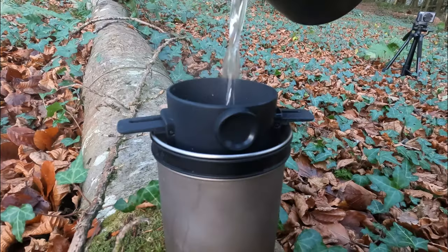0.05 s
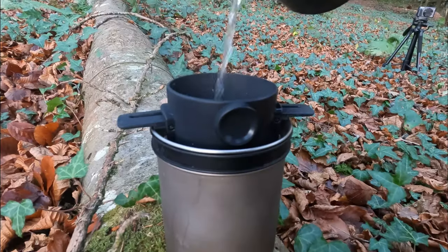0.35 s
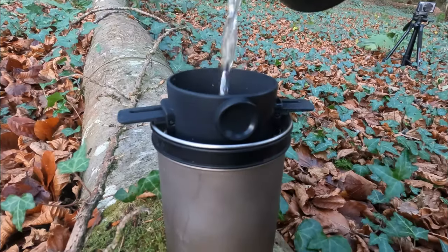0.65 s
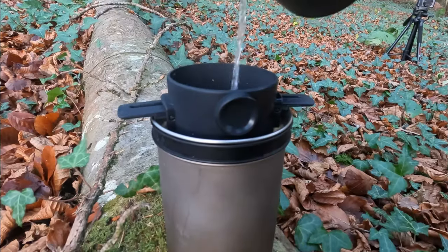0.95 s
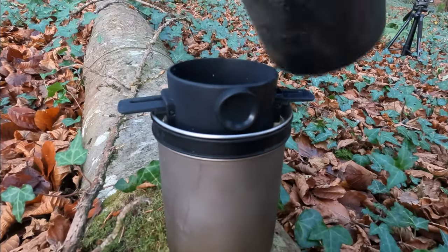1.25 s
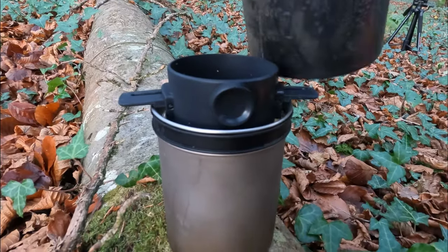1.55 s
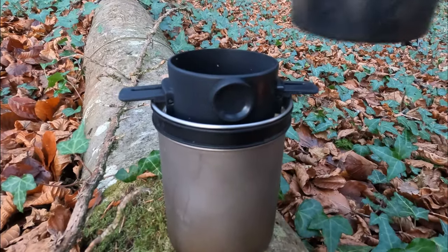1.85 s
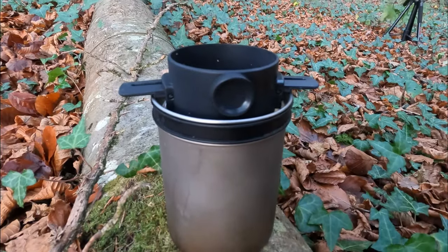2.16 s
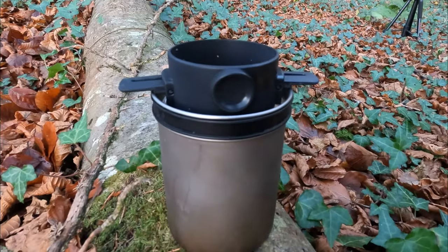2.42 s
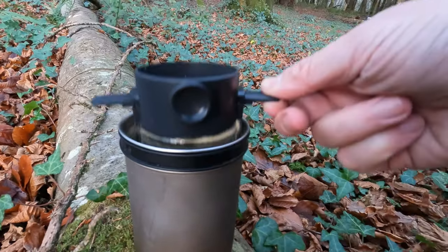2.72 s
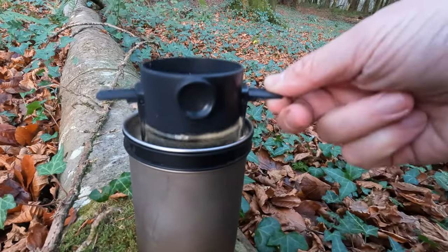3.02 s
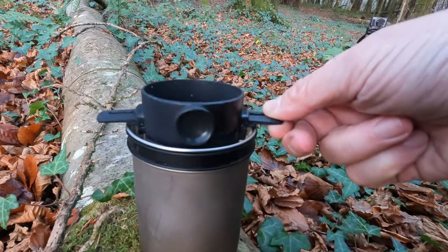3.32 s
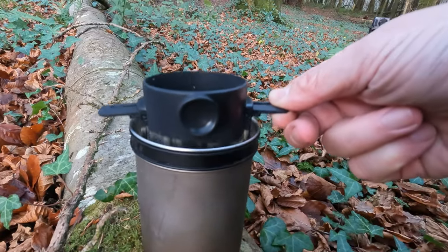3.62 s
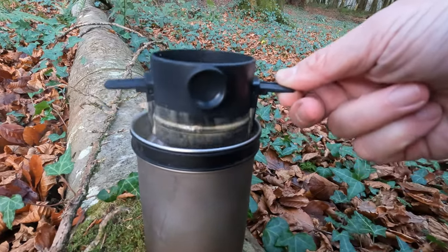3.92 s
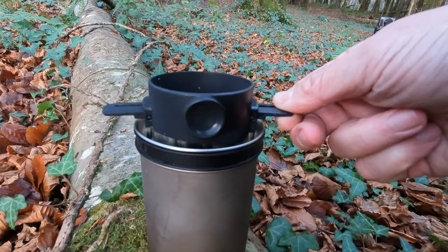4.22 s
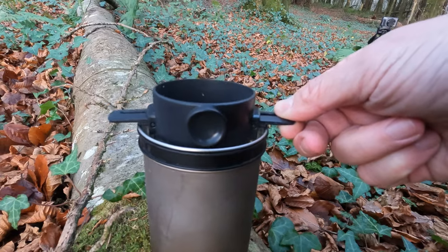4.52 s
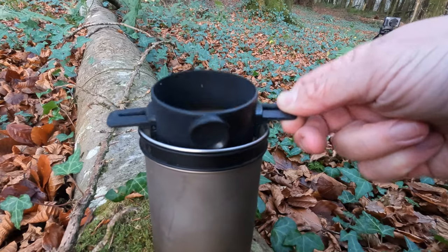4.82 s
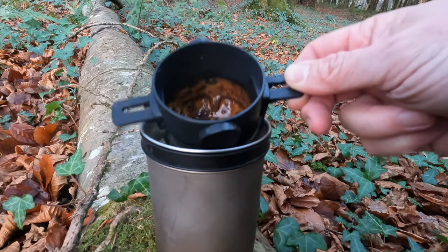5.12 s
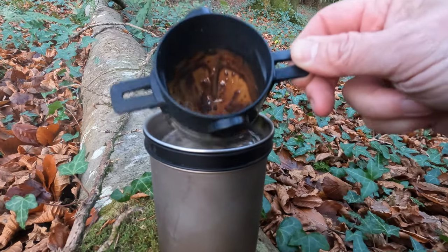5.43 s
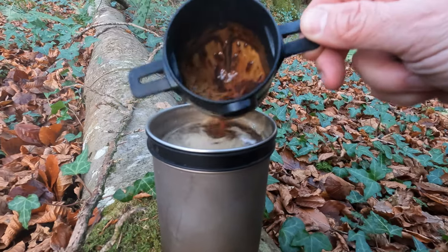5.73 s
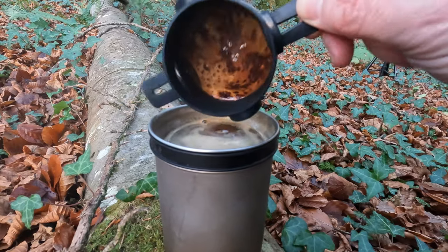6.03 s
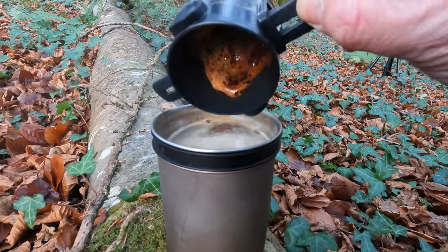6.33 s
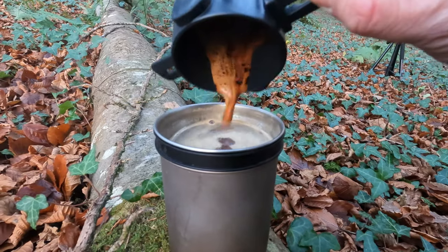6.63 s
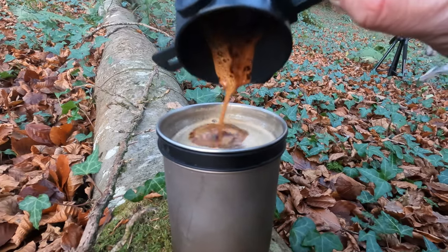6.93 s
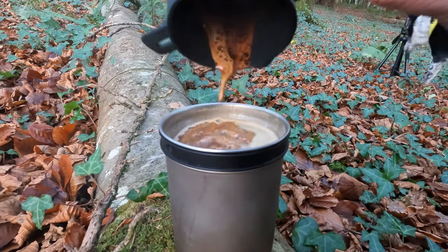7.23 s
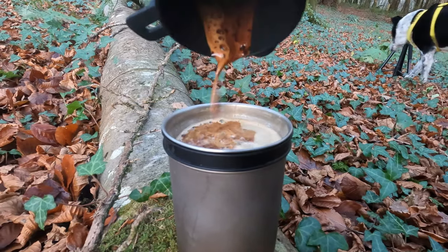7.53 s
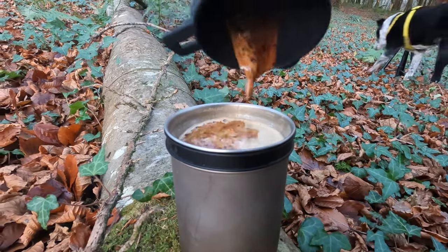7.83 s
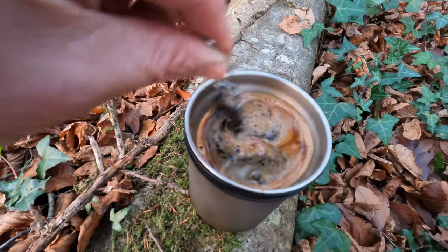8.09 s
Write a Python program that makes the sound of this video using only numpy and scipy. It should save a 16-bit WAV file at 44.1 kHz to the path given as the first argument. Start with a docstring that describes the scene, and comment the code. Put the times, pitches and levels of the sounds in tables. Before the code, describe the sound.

Low gusts of wind buffet the microphone over a faint woodland hush. Close by, water drips and splashes into a plastic coffee filter, stopping just before a pot clacks against it. A run of hollow knocks and clinks follows, with soft gulps of liquid, as the filter dips in a metal cup. Faint paw steps in dry leaves draw nearer, and a spoon briefly clinks and scrapes in the cup.

```python
"""Brewing coffee in the woods

A thin stream of hot water breaks into drops that ring a plastic filter, and the pot bumps its handle.
The filter is dunked in a metal cup, knocking on the rim while coffee gulps through its mesh, then
tipped out; at the end a spoon taps and scrapes the cup. Behind this the woods hush, a dog crushes
dry leaves, and turbulent wind buffets the microphone."""
import sys
import numpy as np
from scipy import signal
from scipy.fft import rfft, irfft
from scipy.io import wavfile
from scipy.ndimage import uniform_filter1d

SR = 44100
rng = np.random.default_rng(int(sys.argv[2]) if len(sys.argv) > 2 else 0)


def to_wav(sig):
    """Store sig (one row per channel, or 1-D mono) as 16-bit WAV at the path in sys.argv[1].

    Samples outside -1..1 are clipped; the rate is SR.
    """
    pcm = np.clip(np.atleast_2d(sig), -1, 1) * 32767
    pcm = np.round(pcm).astype(np.int16)
    wavfile.write(sys.argv[1], SR, pcm.T)  # frames by channels


N = 364266
TIME = np.arange(N) / SR
RING = np.arange(SR // 3) / SR  # time axis of one impact


def amp(db):
    return 10 ** (np.asarray(db) / 20)


def unit_rms(x):
    return x / np.sqrt(np.mean(x ** 2) + 1e-20)


def unit_peak(x):
    return x / (abs(x).max() + 1e-20)


def curve(points, t=TIME):
    """Linear interpolation in time."""
    return np.interp(t, *np.transpose(points))


def at_hz(points, hz):
    """Interpolation on a logarithmic frequency axis."""
    f, value = np.transpose(points)
    return np.interp(np.log(hz + 1), np.log(f + 1), value)


def add(mix, start, sound):
    """Superposition: a sound joins the mix at its start time."""
    part = mix[max(round(start * SR), 0):][:len(sound)]
    part += sound[:len(part)]


def colour(x, spectrum):
    """Spectral shaping, at unit RMS."""
    gain = amp(at_hz(spectrum, np.fft.rfftfreq(len(x), 1 / SR)))
    return unit_rms(irfft(rfft(x) * gain, len(x)))


def band(x, lo_hz, hi_hz):
    return signal.sosfilt(signal.butter(2, [lo_hz, hi_hz], "band", fs=SR, output="sos"), x)


def burst(t60):
    """Exponential decay of white noise."""
    return rng.standard_normal(len(RING)) * amp(-60 * RING / t60)


def ring(modes):
    """Free vibration: one damped sinusoid for each mode (f/Hz, level/dB, t60/s)."""
    return sum(amp(db - 60 * RING / t60) * np.sin(2 * np.pi * hz * RING) for hz, db, t60 in modes)


def resonate(x, hz, width_hz):
    """Forced vibration of a double-pole resonator, held at a nearly even level."""
    pole = np.exp((2j * np.pi * hz - np.pi * width_hz) / SR)
    y = unit_rms(signal.lfilter([1], [1, -2 * pole, pole * pole], x).real)
    return y / np.sqrt(abs(uniform_filter1d(y ** 2, size=1500)) + 0.1)


def clicks(per_s, spread_db, size=N):
    """Shot noise: random impulses, mostly small and a few large."""
    height = amp(spread_db * np.minimum(rng.exponential(1, size), 4))
    return unit_rms(height * rng.choice([-1, 1], size) * (rng.random(size) < per_s / SR))


def wander(per_s):
    """Slow modulation: random values joined by straight lines."""
    return np.interp(TIME * per_s, np.arange(N), rng.standard_normal(N))


def swell(length, rise_s, fall_s):
    """An envelope with linear attack, hold and exponential decay."""
    age = np.arange(0, length + 6 * fall_s, 1 / SR)
    return np.minimum(age / rise_s, 1) * np.exp(-np.maximum(age - length, 0) / fall_s)


def swells(rows, rise_s, fall_s):
    """Incoherent addition: swells (t/s, length/s, level/dB) sum in power."""
    power = np.zeros(N)
    for start, length, db in rows:
        add(power, start, (amp(db) * swell(length, rise_s, fall_s)) ** 2)
    return np.sqrt(power)


def place(x, left_db, lag=0):
    """Level and time differences locate a near source; the left channel is lag samples late."""
    late = np.interp(np.arange(N) - lag, np.arange(N), x)
    return np.array([late * amp(left_db / 2), x * amp(-left_db / 2)])


def spread(one, other):
    """Partial coherence: two unrelated sounds form a distant pair, less alike in the treble."""
    coherence = [(60, 0.88), (150, 0.93), (370, 0.9), (930, 0.85), (2310, 0.53), (5760, 0.77),
                 (14400, 0.71)]  # likeness of left and right: f/Hz, correlation
    balance = [(60, -2), (150, 4), (370, -1), (930, -1), (2310, -1.5), (5760, -2), (14400, 3.5)]  # left minus right: f/Hz, level/dB
    hz = np.fft.rfftfreq(N, 1 / SR)
    same, left_db = at_hz(coherence, hz), at_hz(balance, hz)
    mid = rfft(one) * np.sqrt((1 + same) / 2)
    side = rfft(other) * np.sqrt((1 - same) / 2)
    return irfft([(mid + side) * amp(left_db / 2), (mid - side) * amp(-left_db / 2)], N)


def woods():
    """Far-off air among the trees makes a diffuse field of broadband noise."""
    spectrum = [(100, 6), (300, 7.5), (560, 2.5), (780, -6.5), (1050, -2.5), (1400, -1.5), (1750, -7.5),
                (2200, -13.5), (3500, -21.5), (6500, -26), (8500, -79), (13000, -99), (15000, -55)]  # colour of the hush: f/Hz, level/dB
    hush = [(0, -53.5), (1.4, -52.5), (2.65, -52), (2.78, -52.5), (4.8, -56.5), (5.6, -51), (6.2, -54),
            (7.5, -53.5), (8.26, -49.5)]  # its slow drift: t/s, level/dB
    return amp(curve(hush)) * spread(*(colour(rng.standard_normal(N), spectrum) for _ in range(2)))


def turbulence(spectrum, steady_s):
    """Random pressure fluctuation, divided by its running RMS to remove slow swells."""
    x = colour(rng.standard_normal(N), spectrum)
    power = uniform_filter1d(x ** 2, int(steady_s * SR))
    return x / np.sqrt(abs(power) + 0.004)


def wind(eddy_db=-1, calm_eddy_db=-9, flutter_from_db=-21.5, apart_db=-14, ceiling_db=-7):
    """Turbulent pressure on the microphone: gusts shed eddies; the hardest flutter and overload it."""
    rumble = [(10, -4.5), (18, 7.5), (35, 1.5), (55, 1.5), (80, -7.5), (120, -16.5), (250, -67),
              (700, -130)]  # spectrum of the rumble: f/Hz, level/dB
    eddies = [(40, -17), (65, -4.5), (85, 4.5), (120, -3.5), (160, -9), (220, -16.5), (330, -30),
              (600, -41.5), (2500, -130)]  # spectrum of small eddies: f/Hz, level/dB
    torn_air = [(70, -20), (125, -3), (190, -13.5), (280, -25), (400, -42.5), (800, -46.5), (2500, -130)]  # spectrum of the flutter: f/Hz, level/dB
    steady_flow = [(0, -21), (0.33, -31), (0.55, -20.5), (0.75, -27), (0.9, -25), (1.4, -30.5),
                   (2.1, -25.5), (2.65, -23.5), (2.8, -36.5), (3.2, -33), (3.9, -26.5), (4.6, -28.5),
                   (5.1, -31.5), (5.5, -31.5), (6.15, -26), (6.6, -35.5), (7.25, -33), (8.26, -32)]  # rumble of the breeze: t/s, level/dB
    gusts = [(0.0, 0.19, -26, -37.5), (0.443, 0.092, -22.5, -22), (0.55, 0.099, -30, -34.5),
             (1.155, 0.15, -20.5, -38.5), (1.535, 0.12, -29.5, -32), (1.747, 0.051, -20, -32),
             (2.16, 0.24, -23.5, -28), (2.406, 0.27, -22.5, -31.5), (3.052, 0.031, -22.5, -38),
             (3.26, .06, -24, -33.5), (3.796, 0.21, -31.5, -39), (4.158, 0.091, -22, -48),
             (4.432, .1, -32, -55), (4.567, 0.17, -22.5, -37), (4.955, 0.059, -22, -47),
             (5.216, 0.032, -19, -46), (5.709, 0.075, -21.5, -38), (5.898, .12, -20, -36),
             (6.429, 0.021, -17.5, -40), (6.76, 0.044, -25, -48), (7.433, 0.084, -20.5, -42),
             (7.714, 0.066, -20, -28), (7.946, 0.035, -19, -43)]  # buffets: t/s, length/s, rumble level/dB, eddy level/dB
    balance = [(0, -7.5), (2.5, -6), (7.95, -5.5), (8.02, 1)]  # left minus right: t/s, level/dB
    breeze = amp(curve(steady_flow) + 1.7 * wander(per_s=5.9))
    gust_push, gust_swirl = (swells(np.array(gusts)[:, [0, 1, column]], rise_s=0.013, fall_s=0.017)
                             for column in (2, 3))
    push = np.hypot(breeze, gust_push)
    swirl = np.hypot(amp(calm_eddy_db) * breeze, gust_swirl)
    flutter = swirl * np.minimum(swirl / amp(flutter_from_db), 1) ** 3
    lumps = amp(3 * wander(per_s=24))
    shared, apart = (push * turbulence(rumble, steady_s=0.123)
                     + lumps * swirl * amp(eddy_db) * turbulence(eddies, steady_s=0.09)
                     + lumps * flutter * turbulence(torn_air, steady_s=0.092) for _ in range(2))
    pressure = place(shared, curve(balance)) + amp(apart_db) * apart * np.array([[1], [-1]])
    return amp(ceiling_db) * np.tanh(pressure / amp(ceiling_db))


def leaves(clump_db=1.03, crush_db=-3, snap_db=-3, patch_db=2):
    """Brittle fracture: each paw crushes dry leaves into clumps of tiny cracks, with a few snaps."""
    spectrum = [(300, -29), (600, -2.5), (1200, -8.5), (2000, -7), (2700, -8.5), (3800, -5), (5300, -5),
                (7300, -8), (8300, -15.5), (10500, -18), (13000, -25), (15000, -42)]  # colour of the crackle: f/Hz, level/dB
    rustle = [(0, -58), (1.2, -61), (1.9, -58), (2.62, -62.5), (2.75, -68), (3.9, -65), (4.8, -64.5),
              (5.5, -57.5), (5.88, -62), (6.3, -53.5), (6.8, -56), (7.55, -61.5), (8.26, -72)]  # leaves stirring between steps: t/s, level/dB
    steps = [(.78, 0.02, -53), (1.14, 0.058, -55), (2.08, 0.023, -54.5), (2.65, 0.016, -56.5),
             (3.44, .07, -57), (3.97, 0.059, -54), (4.23, 0.033, -59), (4.45, 0.11, -58),
             (4.71, 0.037, -64), (4.9, 0.16, -55), (5.19, 0.11, -54.5), (5.32, 0.047, -49.5),
             (5.42, 0.048, -55.5), (5.54, 0.065, -52), (5.63, 0.046, -45.5), (5.72, 0.05, -51),
             (5.93, 0.096, -48), (6.03, 0.096, -47.5), (6.23, 0.04, -51), (6.35, 0.019, -56),
             (6.49, 0.055, -50), (6.64, 0.055, -50.5), (6.86, 0.089, -49), (7.075, 0.1, -46),
             (7.18, 0.15, -48), (7.36, 0.07, -48), (7.575, 0.21, -53), (7.815, 0.068, -47),
             (7.91, .06, -52.5)]  # paws, far off and then closer: t/s, length/s, level/dB
    depth = [(0, 3.5), (2.6, 4.5), (3.5, 6), (4.5, 2.5), (5.0, 7.5), (5.3, 3), (6.05, 2), (6.6, -1),
             (7.2, 0), (7.9, -3.5)]  # gain of the dull crush as paws sink in: t/s, level/dB
    twigs = [(0.1432, -39.5, 3800), (1.3103, -35.5, 4170), (1.324, -38.5, 4020), (1.5926, -34, 4300),
             (1.685, -42, 5100), (2.103, -32.5, 4000), (3.1343, -43.5, 4800), (3.996, -36.5, 5230),
             (6.5132, -31, 5000), (6.95, -34, 5850), (7.9446, -41, 6860)]  # single leaves and twigs snapping: t/s, level/dB, f/Hz
    envelope = np.hypot(amp(curve(rustle)), swells(steps, rise_s=0.012, fall_s=0.034))
    envelope *= amp(clump_db * wander(per_s=80))
    crushes = (clicks(per_s=3000, spread_db=3) + amp(crush_db) * rng.standard_normal(N)
               for _ in range(2))
    cracks = spread(*(colour(crush, spectrum) for crush in crushes))
    hz, t, cells = signal.stft(cracks, SR, nperseg=256)
    # every leaf has its own pitch, so the crackle comes in patches of frequency and time
    patches = uniform_filter1d(rng.standard_normal(cells.shape[1:]), size=7, axis=0)
    patches = unit_rms(uniform_filter1d(patches, size=6, axis=1))
    dull_db = np.interp(hz, [2500, 4000], [1, 0])[:, None] * curve(depth, t)
    cracks = signal.istft(cells * amp(patch_db * patches + dull_db), SR, nperseg=256)[1][:, :N]
    snaps = np.zeros(N)
    for start, db, centre_hz in twigs:
        snap = band(burst(t60=0.045), centre_hz * 0.76, centre_hz * 1.36)
        add(snaps, start, amp(db + snap_db) * unit_peak(snap))
    return envelope * cracks + place(snaps, left_db=3)


def surroundings(x, wet_db=-19, t60=0.06):
    """Scattering by the log under the cup and the leafy ground adds a faint, short tail."""
    tails = [band(burst(t60), 360, 4100) * (1 - np.exp(-RING / 0.001)) for _ in range(2)]
    scattered = [signal.oaconvolve(side, tail / np.linalg.norm(tail))[:N]
                 for side, tail in zip(x, tails)]
    return x + amp(wet_db) * np.array(scattered)


def slosh():
    """Cavity resonance: gulps through the mesh sound the cup's air, pitched by the filter's depth."""
    gulps = [(3.01, 0.033, -53, 587), (3.151, 0.083, -46.5, 400), (3.256, 0.11, -57, 388),
             (3.83, 0.044, -61, 473), (4.133, 0.077, -49.5, 370), (4.195, .06, -46.5, 387),
             (4.537, .03, -50, 377), (5.065, 0.074, -52.5, 435), (5.318, .08, -48, 480),
             (5.44, 0.014, -44, 520)]  # the filter dips or lifts: t/s, length/s, level/dB, f/Hz
    out = np.zeros(N)
    for start, length, db, hz in gulps:
        flow = swell(length, rise_s=0.012, fall_s=0.011)
        bubbles = resonate(clicks(per_s=1300, spread_db=2, size=SR), hz, width_hz=150)
        add(out, start, amp(db) * flow * bubbles[:len(flow)])
    return place(out, left_db=-1.5)


def spoon(grit_db=-11, falloff_db_per_octave=17, wall_db=-7, rasp_db=-4):
    """Impact and stick-slip friction: the spoon taps and skids, exciting the wall of the full cup."""
    wall_modes = [(1170, 30, 0.0072), (1298, 8.5, 0.082), (1900, 18, 0.018), (2030, -14, 0.028),
                  (2350, -4, 0.041), (2730, 1.5, 0.034), (3000, -24, 0.022), (3240, 0, 0.026),
                  (3670, -25, 0.037), (4450, -25, .015)]  # modes of the full cup: f/Hz, level/dB, t60/s
    taps = [(8.002, -32, 1770, 0.0039), (8.042, -30.5, 1840, 0.0051), (8.07, -27, 2000, 0.0025),
            (8.079, -24.5, 3100, 0.0025), (8.083, -33.5, 1260, 0.018), (8.157, -32.5, 1310, 0.078),
            (8.197, -37, 1300, 0.011)]  # contacts: t/s, level/dB, favoured f/Hz, scrape time/s
    drags = [(7.994, 0.068, -51, 2060), (8.071, 0.1, -51.5, 3020), (8.147, 0.033, -49, 2450),
             (8.175, .025, -66, 3170)]  # skids round the wall: t/s, length/s, level/dB, singing f/Hz
    out = np.zeros(N)
    for start, db, favoured_hz, scrape_s in taps:
        modes = [(hz, level - falloff_db_per_octave * abs(np.log2(hz / favoured_hz)), t60)
                 for hz, level, t60 in wall_modes]
        metal = ring(modes) * (1 - np.exp(-3 * RING / scrape_s))
        grit = band(np.exp(-RING / scrape_s) * rng.standard_normal(len(RING)), 580, 3300)
        add(out, start, amp(db) * unit_peak(unit_rms(metal) + amp(grit_db) * unit_rms(grit)))
    for start, length, db, sing_hz in drags:
        press = swell(length, rise_s=0.0053, fall_s=0.021)
        slips = clicks(per_s=1500, spread_db=2, size=SR)
        wall = unit_rms(signal.oaconvolve(slips, ring(wall_modes))[:SR])
        rasp = unit_rms(band(band(slips, 1600, 4200), 1600, 4200))
        scrape = resonate(slips, sing_hz, width_hz=340) + amp(wall_db) * wall + amp(rasp_db) * rasp
        add(out, start, amp(db) * press * scrape[:len(press)])
    return place(out, left_db=0)


def pot(crack_db=-7, clatter_db=-7):
    """Impact and rebound: thin metal chatters on the plastic handle; the jolted filter clatters."""
    modes = [(600, -11, 0.027), (1230, -7, 0.058), (1620, 2.5, 0.022), (2070, -7, 0.034), (2480, -18, .03),
             (2830, -6, 0.03), (3580, -13, 0.15), (3740, 5.5, .012), (4040, 3, 0.017), (5530, -4, 0.013),
             (6900, -4.5, 0.023)]  # modes of the pot: f/Hz, level/dB, t60/s
    bumps = [(1.5402, -14.5), (1.542, -32), (1.569, -33), (1.580, -28)]  # the blow and its chatter: t/s, level/dB
    metal = unit_rms(ring(modes))
    out = np.zeros(N)
    for start, db in bumps:
        crack = unit_rms(band(band(burst(t60=0.0051), 1400, 3600), 1300, 7300))
        clatter = unit_rms(band(burst(t60=0.13), 280, 1340))
        add(out, start, amp(db) * unit_peak(metal + amp(crack_db) * crack + amp(clatter_db) * clatter))
    return place(out, left_db=-1, lag=0.8)


def pour(patter_db=1, spray_db=-19, detune=0.055):
    """Impulse excitation: the stream breaks into drops that splash and ring the damped plastic basket."""
    modes = [(1140, -33, .008), (1573, 4, 0.019), (1854, 9.5, 0.0066), (2330, -11, 0.0082),
             (3520, -6.5, 0.016)]  # modes of the wet basket: f/Hz, level/dB, t60/s
    stream = [(0.0, -56), (0.538, -56), (0.708, -63), (0.916, -57), (1.056, -53), (1.258, -59.5),
              (1.4, -60)]  # fine patter: t/s, level/dB
    drops = [(0.0074, -27, -11), (0.0595, -29.5, -7), (0.092, -34, -24), (0.122, -23.5, -32),
             (0.3, -34, -11), (0.3455, -24, -20), (0.399, -29, -11), (0.421, -25, -12), (0.5415, -19, -9.5),
             (0.6131, -27.5, -34), (0.6658, -28.5, -27), (0.706, -27.5, -34), (0.72, -29, -35),
             (0.9371, -29, -11), (0.9847, -32.5, -2), (1.0464, -32, -6), (1.1072, -33, -19),
             (1.126, -29.5, -5), (1.1404, -28, -12), (1.1882, -32, -8)]  # large drops: t/s, level/dB, relative splash level/dB

    def basket():
        return ring([(hz * (1 + detune * rng.standard_normal()), db, t60) for hz, db, t60 in modes])

    flow = amp(curve(stream) + patter_db) * np.interp(TIME, [1.2, 1.36], [1, 0])
    patter = sum(signal.oaconvolve(clicks(per_s=87, spread_db=5.5), basket())[:N] for _ in range(5))
    spray = band(band(clicks(per_s=150, spread_db=6), 8600, 16000), 8600, 16000)
    out = flow * (unit_rms(patter) + amp(spray_db) * unit_rms(spray))
    for start, db, splash_db in drops:
        splash = unit_rms(band(burst(t60=0.0062), 3060, 5200))
        add(out, start, amp(db) * unit_peak(unit_rms(basket()) + amp(splash_db) * splash))
    return place(out, left_db=-0.5, lag=1)


def knocks(hollow_t60=0.078, thud_db=-3, crack_db=-6, tick_db=-5):
    """Modal ringing of filter on cup: the contact point tunes the rim, the filter's depth the hollow."""
    cup_modes = [(1650, 5, 0.026), (2130, -0.5, 0.024), (2545, 6, 0.01), (2800, 0.5, 0.026),
                 (4670, 10.5, 0.0067), (5200, 2, 0.014), (7100, 5, 0.008)]  # modes of the metal cup: f/Hz, level/dB, t60/s
    # blows: t/s, level/dB, rim f/Hz, hollow f/Hz, hollow level/dB, brightness/dB, rim t60/s
    blows = [(2.697, -39.5, 1450, 605, -16, -25, 0.018), (2.801, -33.5, 1400, 540, -4, -11, 0.013),
             (2.971, -23, 1200, 590, -5, -5, 0.068), (3.292, -36, 1170, 482, 0, -27, 0.065),
             (3.345, -30, 920, 545, 2.5, -7, 0.05), (3.378, -19.5, 1330, 390, -15, -13.5, 0.031),
             (3.463, -38.5, 1180, 615, 17, -12, .035), (3.719, -38.5, 1130, 460, -3, -11, 0.011),
             (3.841, -32, 1050, 470, 22, 5, 0.022), (4.247, -35, 1185, 385, -5, -22, 0.026),
             (4.328, -21.5, 1350, 380, -6, -10.5, 0.028), (4.531, -21, 1090, 460, -13, -10.5, 0.019),
             (4.643, -35, 960, 454, 3, -1, 0.026), (5.124, -37, 1250, 507, 26, -15, 0.047),
             (5.326, -21, 1140, 525, 1.5, -11, 0.13), (5.385, -30.5, 883, 463, -2, -11, 0.082),
             (5.439, -28, 1200, 737, 1.5, -12, 0.06)]
    soft_onset, firm_onset = 1 - np.exp(-RING / 0.00088), 1 - np.exp(-RING / 0.00056)
    low_modes, high_modes = unit_rms(ring(cup_modes[:4])), unit_rms(ring(cup_modes[4:]))
    out = np.zeros(N)
    for start, db, rim_hz, hollow_hz, hollow_db, bright_db, t60 in blows:
        rattle = unit_rms(band(burst(t60), rim_hz * 0.81, rim_hz * 1.38))
        rattle_db = -4 + 0.71 * hollow_db  # the hollower the blow, the more the rim rattles
        rim = unit_rms(ring([(rim_hz, 0, t60)])) + amp(rattle_db) * rattle
        thud = unit_rms(band(burst(hollow_t60), 283, 780))
        hollow = unit_rms(ring([(hollow_hz, 0, hollow_t60)])) + amp(thud_db) * thud
        crack = unit_rms(band(burst(t60=0.022), 2400, 6300))
        tick = unit_rms(high_modes + amp(crack_db) * crack)
        body = soft_onset * (rim + amp(hollow_db) * hollow)
        clink = firm_onset * amp(bright_db) * (low_modes + amp(tick_db) * tick)
        add(out, start, amp(db) * unit_peak(body + clink))
    return place(out, left_db=-1.1, lag=0.82)


def scene():
    """Superposition of the near brewing sounds, their scattered tail and the background."""
    brewing = pour() + pot() + knocks() + slosh() + spoon()
    return surroundings(brewing) + leaves() + woods() + wind()


def record(dry):
    """Band limiting by a linear-phase low-pass filter, with a soft start and end."""
    cutoff_hz, fade_s = 14600, 0.004
    fade = np.minimum(np.minimum(TIME, TIME[::-1]) / fade_s, 1)
    lowpass = signal.firwin(511, cutoff_hz, window=("kaiser", 9), fs=SR)
    return signal.oaconvolve(dry * fade, lowpass[None], "same")


dry = scene()
out = record(dry)
to_wav(out)
```